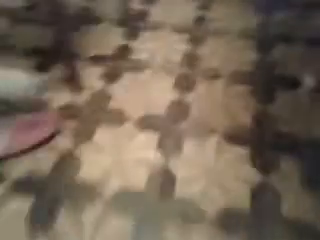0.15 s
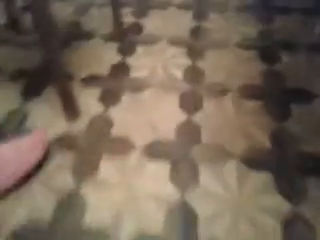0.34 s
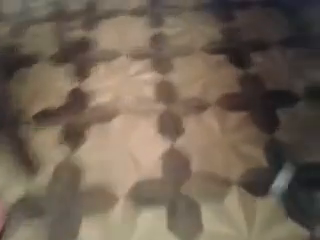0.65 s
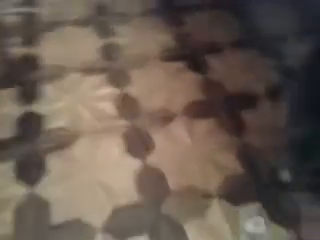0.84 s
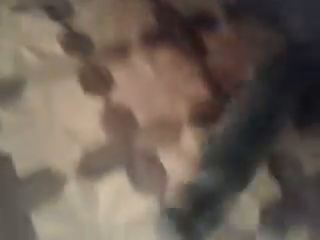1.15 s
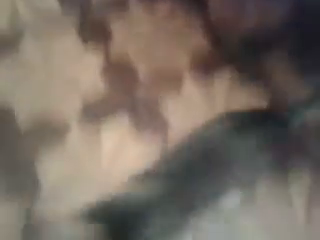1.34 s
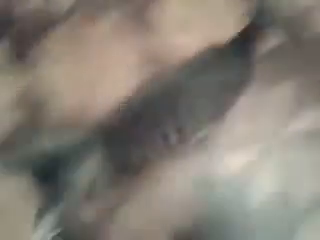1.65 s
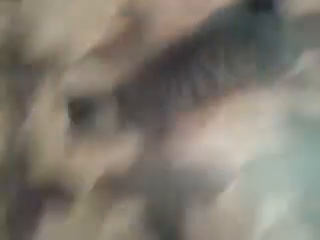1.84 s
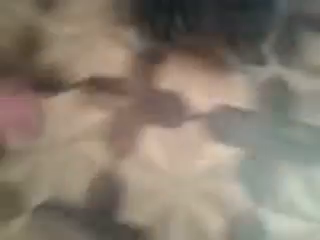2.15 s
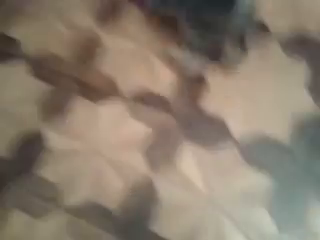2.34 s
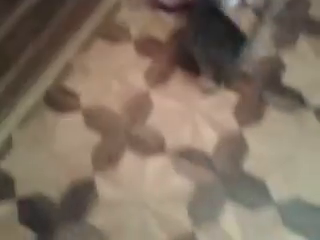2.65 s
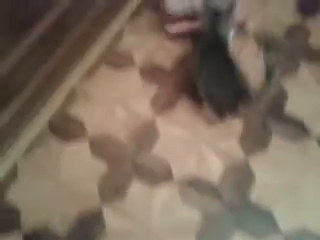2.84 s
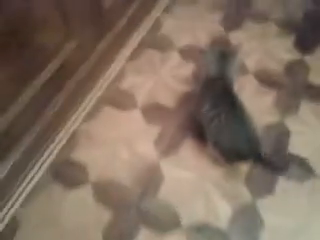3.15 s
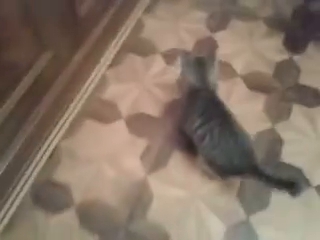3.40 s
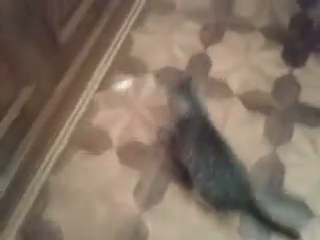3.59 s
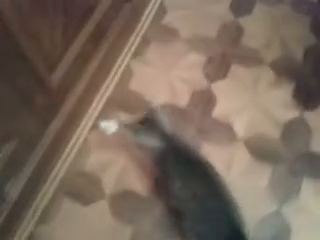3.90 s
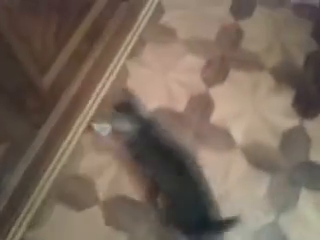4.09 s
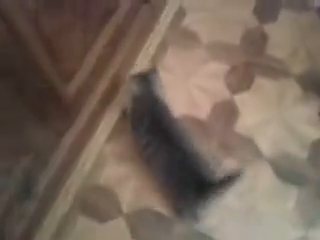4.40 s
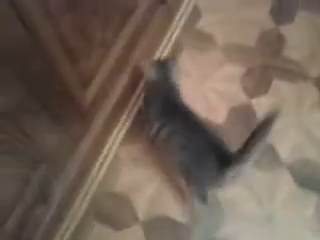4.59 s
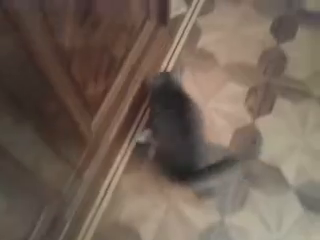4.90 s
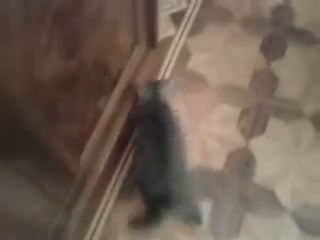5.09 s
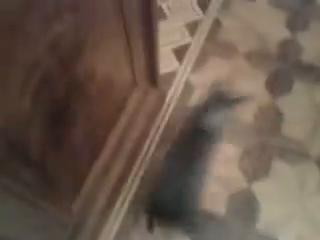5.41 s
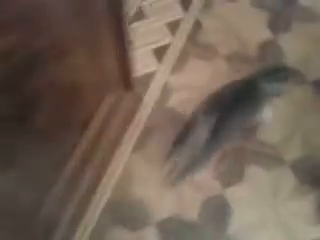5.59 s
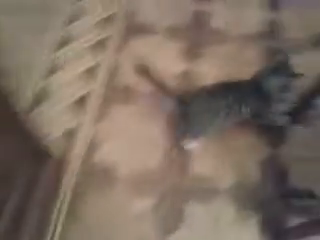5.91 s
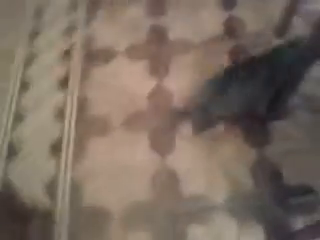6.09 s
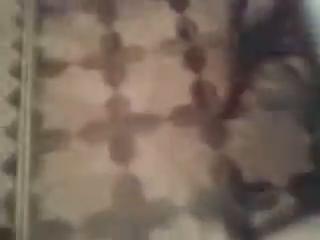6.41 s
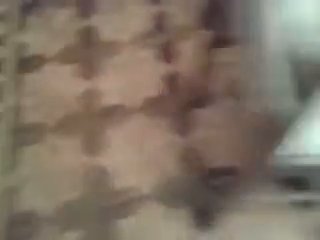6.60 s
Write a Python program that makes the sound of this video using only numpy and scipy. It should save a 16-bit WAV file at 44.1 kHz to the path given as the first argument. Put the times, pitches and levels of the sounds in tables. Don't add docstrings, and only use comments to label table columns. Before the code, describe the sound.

A kitten plays with a small crumpled ball on a tiled floor in a bare, echoing room. Claws tick sharply, paws scrape and the ball rustles, busiest at first. After a clear knock come two loud, bright clatters with ringing echoes mid-way, then quieter rustling slides and a final sharp crack. The handheld recorder is thin in the bass and hissy.

```python
import sys
import numpy as np
from scipy import signal
from scipy.fft import rfft, irfft, next_fast_len
from scipy.io import wavfile

SR = 44100
rng = np.random.default_rng(int(sys.argv[2]) if len(sys.argv) > 2 else 0)


def ratio(d):
    e = np.asarray(d, float) / 20
    return 10 ** e


def waveform_to_disk(signal):
    frames = np.transpose(np.atleast_2d(signal))
    scaled = np.clip(frames, -1, 1) * 32767
    samples = np.round(scaled).astype(np.int16)
    wavfile.write(sys.argv[1], SR, samples)


N = 297461


def rms_one(x):
    return x / np.sqrt(np.mean(x ** 2) + 1e-20)


def at_hz(points, hz):
    table_hz, values = np.array(points).T
    return np.interp(np.log(hz), np.log(table_hz), values)


def butter(x, hz, kind, order=2):
    return signal.sosfilt(signal.butter(order, hz, kind, fs=SR, output="sos"), x)


def colour(x, spectrum):
    size = next_fast_len(N)
    hz = np.maximum(np.arange(size // 2 + 1) * SR / size, 1)
    shaped = rfft(x, size) * ratio(at_hz(spectrum, hz))
    return rms_one(irfft(shaped, size)[:N])


def ring(clicks, hz, t60):
    r = ratio(-60 / (t60 * SR))
    w = 2 * np.pi * hz / SR
    return signal.lfilter([0, np.sin(w)], [1, -2 * r * np.cos(w), r * r], clicks + 1e-18)


def fading(at_s, level_db, t60, build_s):
    energy = np.full(N, 1e-18)
    np.add.at(energy, (np.asarray(at_s) * SR).astype(int), ratio(2 * level_db))
    fall = ratio(-120 / (t60 * SR))
    rise = np.exp(-1 / (build_s * SR))
    return np.sqrt(signal.lfilter([1 - rise], np.convolve([1, -fall], [1, -rise]), energy))


def hiss():
    # frequency in Hz, level in dB per Hz.
    hiss_spectrum = [(65, -72.5), (110, -17.5), (227, 8), (511, 9), (1280, 6), (1670, -10), (4800, 0.5),
                     (6710, -13), (7080, 0), (7460, -35.5), (9700, -52), (16400, -120)]
    level_db = -63
    return ratio(level_db + 1.5) * colour(rng.standard_normal(N), hiss_spectrum)


def rumble():
    # time of a jolt in seconds, level in dB.
    jolts = [(0.18, -72), (0.74, -78), (1.26, -66), (1.38, -80), (1.95, -80), (2.2, -77), (3.04, -65),
             (3.11, -62), (3.31, -62), (3.5, -68), (3.658, -42.5), (4.56, -78), (4.8, -79), (5.22, -78),
             (6.1, -80), (6.38, -77), (6.54, -77)]
    shake = ratio(-80) + fading(*np.transpose(jolts), t60=0.77, build_s=.02)
    low = butter(rng.standard_normal(N), 55, "low", order=6)
    return shake * rms_one(butter(low, 36, "high", order=2))


def pressure():
    # time in seconds, level in dB.
    bustle = [(0.0, -44.5), (0.29, -47), (0.45, -49), (0.66, -47.5), (1.5, -48.5), (1.7, -45.5),
              (2.4, -48.5), (2.65, -50), (2.8, -50.5), (3.1, -51.5), (4.0, -58.5), (4.6, -55.5),
              (4.72, -67.5), (4.94, -54), (5.7, -64), (5.97, -59), (6.2, -54.5), (6.75, -58)]
    # start in seconds, hold in seconds, bright rustle in dB,
    # dull scrape in dB.
    slides = [(0.86, 0.02, -45, -63), (0.928, 0.015, -51, -46), (1.113, 0.036, -53.5, -50),
              (1.198, 0.14, -47, -42.5), (1.405, 0.035, -45.5, -57), (1.872, 0.085, -42.5, -46),
              (1.927, 0.018, -35, -42.5), (1.986, 0.12, -38.5, -57), (2.146, 0.025, -35, -42),
              (2.258, 0.091, -59, -43.5), (3.337, 0.055, -48, -47.5), (3.885, 0.036, -51, -70),
              (4.307, 0.051, -33.5, -53.5), (4.393, 0.11, -48, -49.5), (4.968, 0.027, -45, -56),
              (4.998, 0.12, -37, -61), (5.096, 0.065, -34, -59), (5.19, 0.046, -43.5, -60),
              (5.268, 0.021, -33, -55), (5.323, 0.064, -48, -67), (5.38, 0.019, -42.5, -64),
              (5.454, 0.026, -52.5, -52.5), (6.504, 0.01, -39.5, -57), (6.573, 0.11, -43, -55.5)]
    attack_s, release_db_per_s = 0.01, 147.5
    scrape_db, scrape_follows = -56, 1
    bustle_db = np.interp(np.arange(N) / SR, *np.transpose(bustle))
    dull_db = scrape_db + scrape_follows * (bustle_db - bustle_db.mean())
    power = ratio(2 * np.array([bustle_db, dull_db]))
    for s, hold_s, *levels_db in slides:
        start = int(s * SR)
        t = np.arange(min(SR, N - start)) / SR
        release = ratio(-release_db_per_s * np.maximum(t - attack_s - hold_s, 0))
        shape = np.minimum(t / attack_s, 1) * release
        power[:, start:start + SR] += (ratio(np.reshape(levels_db, (-1, 1))) * shape) ** 2
    return np.sqrt(power)


def friction(spectrum, per_s, size_db, wet_db, patchy_db):
    sizes = ratio(size_db * np.minimum(rng.exponential(1, N), 5))
    slips = (rng.random(N) < per_s / SR) * sizes * rng.choice([-1, 1], N)
    clumps = ratio(3.2 * rms_one(butter(rng.standard_normal(N), 25, "low")))
    blur = ratio(wet_db) * rng.standard_normal(N)
    even = colour(rms_one(slips * clumps) + blur, spectrum)
    edges = np.linspace(np.sqrt(100), np.sqrt(8500), 9) ** 2
    wander = ratio(patchy_db * rng.standard_normal((len(edges), 60)))
    wander[::2] *= -1
    place = np.linspace(0, 59, N)
    out = np.zeros(N)
    for low, high, gains in zip(edges, edges[1:], wander):
        out += butter(even, [low, high], "band") * np.interp(place, np.arange(60), gains)
    return rms_one(out)


def shell(x):
    # frequency in Hz, width in Hz, level in dB.
    ball_shell = [(4440, 420, -21.5), (5575, 660, -14.5), (7180, 350, -19)]
    lifted = sum(ratio(db) * rms_one(ring(x, hz, 1.3 / width_hz)) for hz, width_hz, db in ball_shell)
    return rms_one(x + lifted)


def scuff():
    # frequency in Hz, level in dB per Hz.
    rustle_spectrum = [(880, -42.5), (1500, -11), (2670, -19.5), (3310, -11.5), (3860, -11.5), (4250, -9.5),
                       (6700, -2), (7460, 7.5), (9700, -44.5), (16400, -120)]
    scrape_spectrum = [(88, -68.5), (150, -26), (183, -19), (498, -6), (1270, -2), (1860, -2), (3500, -7.5),
                       (4550, -24.5), (7700, -120)]
    rustle, scrape = pressure()
    bright = shell(friction(rustle_spectrum, 5000, size_db=3, wet_db=2, patchy_db=2.2))
    dull = friction(scrape_spectrum, 1500, size_db=2.5, wet_db=4, patchy_db=1.4)
    return rustle * bright + scrape * dull


def contacts():
    # time in seconds, peak in dB, fullness in dB, room share in dB.
    claws = [(0.0963, -28, -24, 4), (0.1389, -32, -7, 7), (0.6215, -22.5, -11, 0), (0.7579, -16, -2, 1),
             (0.8737, -23.5, -7, 3), (0.9198, -22.5, -16, -19), (1.0885, -17.5, -18, -1),
             (1.0925, -12.5, -6, -4.5), (1.2272, -10.5, -19, -2), (1.3723, -22, -2, 2),
             (1.5591, -11.5, -23, -1.5), (1.6801, -22, -39, -1.5), (1.94, -10.5, -23, -2),
             (2.0337, -23.5, -3, 4.5), (3.3459, -19, -22.5, 4), (4.205, -33, -1, 5), (4.2882, -17, -16, 1),
             (4.7012, -29, 1, 0.5), (5.1144, -19.5, -22, 7.5), (5.294, -23.5, -28, 0),
             (5.3237, -19, -23, -6), (5.4785, -23, -3, -4), (5.6254, -36, 6, 4), (5.658, -20.5, -3.5, 0),
             (5.9985, -25, 3.5, -14), (5.9935, -35, -2, -3), (1.156, -27, 4, 8), (1.1805, -28, 7.5, 9.5),
             (1.5254, -27.5, 3, -5)]
    ball = [(0.1604, -25.5, -0.5, 4.5), (0.2663, -32.5, 8.5, 3), (0.7956, -21, -6, -23),
            (1.059, -23.5, -3, 3), (1.578, -26, 0, 5.5), (1.7265, -22.5, -7, -13), (1.9164, -25, -4, -3),
            (2.1114, -24, -4, 9), (2.2872, -14, -29, -4.5), (2.3144, -17, -6.5, 0.5), (2.4304, -34.5, 5, 3),
            (2.5656, -27.5, -1, -3), (2.7326, -13.5, -4.5, -0.5), (2.988, -34, 4, 2.5),
            (3.3678, -20, -8, -19), (4.6507, -27.5, -8, 0.5), (5.2724, -26, 3, 3.5), (5.4475, -34, 6, -3),
            (5.5611, -19, -8.5, 2.5), (5.7751, -32, -14, 5.5), (6.0084, -15, -7, -25),
            (6.2684, -34.5, -10, 8.5), (6.3602, -25, -3, 4), (6.5073, -29.5, 3.5, 2),
            (6.5689, -29, -3, 12.5)]
    paws = [(0.6654, -30, 0.5, 5), (0.7842, -29, -20, 1), (0.9382, -30.5, 4.5, -18),
            (0.9461, -30.5, -10, -11), (1.6484, -38, -26, 2), (1.6994, -38, 9, -4), (1.7141, -43, 16.5, 4),
            (1.8312, -41, -14, 4), (2.156, -24, -28, -2), (2.911, -38.5, 0, 8), (3.0322, -26.5, 5.5, -7.5),
            (3.2847, -42.5, -2, 15), (4.119, -43, 10.5, 6.5), (4.6401, -40.5, 17, 1.5),
            (5.5976, -40.5, 13, 5), (6.2994, -51.5, 21, 1), (6.3184, -44, 13, 6.5)]
    kinds = [(claws, -30.5), (ball, -17.5), (paws, 0)]
    return np.array([(s, db, full_db, body_db, wet_db)
                     for rows, body_db in kinds for s, db, full_db, wet_db in rows])


def rattle(rows, contact_ms, count):
    s, *levels_db = np.repeat(rows, count, axis=0).T
    late = rng.random((len(rows), count)) * (np.arange(count) > 0) * np.reshape(contact_ms, (-1, 1))
    return s + late.ravel() / 1000, levels_db


def tint(hz, top_db, *rel_db):
    colour_hz = [350, 900, 2200, 4800]
    # frequency in Hz, level in dB.
    mic_colour = [(150, -35.5), (400, -5), (1000, 10), (3000, -1), (5000, -3.5), (6800, 1.5), (7400, 6.5)]
    points_hz = colour_hz[-len(rel_db) - 1:]
    shares = [np.interp(np.log(hz), np.log(points_hz), row) for row in np.eye(len(points_hz))]
    return top_db + sum(share * db for share, db in zip(shares, rel_db[::-1])) + at_hz(mic_colour, hz)


def strike(at_s, levels_db, cycles, uneven_db, count=30):
    at = (np.asarray(at_s) * SR).astype(int)
    out = np.zeros(N)
    luck = rng.standard_normal((len(at), 2 * count))
    for k, hz in enumerate(np.linspace(np.sqrt(330), np.sqrt(7250), count) ** 2):
        strength = ratio(tint(hz, *levels_db) + uneven_db * luck[:, k])
        clicks = np.zeros(N)
        np.add.at(clicks, at, strength * np.sign(luck[:, count + k]))
        out += ring(clicks, hz, cycles / hz + 0.0067)
    return butter(out, 570, "high", order=3)


def room(at_s, build_s, *levels_db):
    # frequency in Hz, time to fall 60 dB in seconds.
    room_t60 = [(200, 0.64), (700, 0.64), (2000, 0.59), (4000, 0.69), (7000, 0.47)]
    # frequency in Hz, level in dB.
    room_warmth = [(200, 14), (500, 8), (1200, -1)]
    edges = 170 * 2 ** np.arange(0, 5.7, 1 / 3)
    white = rng.standard_normal((2, N))
    out = np.zeros(N)
    for k, (low, high) in enumerate(zip(edges, edges[1:])):
        hz = np.sqrt(low * high)
        level_db = tint(hz, *levels_db) + at_hz(room_warmth, hz)
        echo = fading(at_s, level_db, at_hz(room_t60, hz), build_s)
        out += butter(white[k % 2], [low, high], "band") * echo
    return out


def ticks():
    rows = contacts()
    s, top_db, middle_db, body_db, wet_db = rows.T
    at_s, levels_db = rattle(rows[:, :4], contact_ms=3.0, count=3)
    direct = strike(at_s, levels_db, cycles=1.7, uneven_db=1.5) * ratio(-17.5)
    t = np.arange(SR // 20) / SR
    scatter = rng.standard_normal(len(t)) * ratio(-22 - 60 * t / .025) * (t > .0006)
    echoes = room(s + 0.0022, 0.00073, top_db + wet_db - 13.5, middle_db, body_db)
    return direct + signal.fftconvolve(direct, scatter)[:N] + echoes


def pings():
    # start in seconds, frequency in Hz, level in dB, ring time in seconds.
    ping_rows = [(0.2658, 2300, -36, 0.014), (0.7579, 7040, -19, .01), (1.5591, 4650, -29, 0.013),
                 (1.6477, 313, -38, .06), (1.6813, 5550, -26, 0.018), (2.158, 790, -43, .03),
                 (2.157, 1830, -23.5, 0.021), (2.733, 6060, -27, .015), (3.0338, 1050, -20, 0.014),
                 (3.032, 2600, -32, 0.0085), (2.66, 368, -45, 0.17), (0.6654, 1320, -29, .015),
                 (0.9461, 1520, -30, .015), (4.305, 4080, -30, 0.04), (4.7002, 4500, -35, 0.019),
                 (5.4785, 3450, -30, 0.022), (5.5619, 6970, -12.5, .01), (5.657, 3950, -23, 0.011),
                 (6.0075, 7030, -0.5, 0.0073)]
    out = np.zeros(N)
    t = np.arange(SR // 10) / SR
    for s, hz, db, t60 in ping_rows:
        start = int(s * SR)
        swell = 1 - np.exp(-t * hz / 1.0)
        out[start:start + len(t)] += ratio(db - 60 * t / t60) * swell * np.sin(2 * np.pi * hz * t)
    return out


def ripple(x):
    depth_db, width_hz = 2.1, 80
    size = next_fast_len(N)
    hz = np.arange(size // 2 + 1) * SR / size
    bumps_db = depth_db * np.interp(hz / width_hz, np.arange(600), rng.standard_normal(600))
    return irfft(rfft(x, size) * ratio(bumps_db), size)[:N]


def knocks():
    # time in seconds, top in dB, middle and body in dB #
    # relative to the top, contact time in ms.
    knock_rows = [
        (0.3094, -33, 3, -22, 12),
        (1.6482, -52, -6, 7, 6.9),
        (2.6027, -18.5, -5.5, -13, 4.6),
        (3.0314, -45, 11, 13.5, 11),
        (3.4101, -7, -3.5, -13.5, 4.4),
        (3.6599, -5, -7.5, -8, 16),
        (3.6667, -16.5, 15.5, 4, 10),
        (4.8494, -56, -52, 7.5, 5.3),
        (6.0107, -15.5, -25, -18, 2.2),
        (6.0164, -22.5, 5, -24, 2.2),
    ]
    # start in seconds, frequency in Hz, width in Hz, level in dB, time to fall 60 dB in seconds.
    clinks = [(.305, 3410, 150, -41, 0.6), (0.31, 1704, 150, -42.5, 0.39), (4.976, 5650, 400, -41, .5),
              (5.6, 4330, 250, -46, 0.96), (4.85, 740, 320, -50.5, 1), (2.61, 2510, 27, -30, 0.5),
              (2.61, 2600, 38, -31.5, 0.53), (2.6, 1540, 85, -36, 0.69), (2.61, 2330, 240, -36, 0.68),
              (2.61, 3380, 60, -50, 0.32), (2.61, 3300, 60, -41, 0.28), (2.61, 6850, 60, -36, 0.34),
              (2.61, 1950, 150, -39, 0.92), (3.67, 1730, 80, -30, 0.31), (3.67, 2940, 78, -24.5, .5),
              (3.411, 2310, 79.5, -34, 0.76), (3.41, 1500, 420, -24, 0.62), (3.429, 250, 40, -45, 0.67),
              (3.669, 1300, 204, -19.5, 0.16)]
    *columns, body_db, contact_ms = np.transpose(knock_rows)
    thud_db = -5 + 1.65 * body_db
    rows = np.transpose([*columns, body_db, thud_db])
    at_s, (top_db, *rel_db) = rattle(rows, contact_ms, count=6)
    out = ripple(room(at_s - .001, 0.00039, top_db - 11, *rel_db))
    white = butter(rng.standard_normal(N), 210, "high", order=4)
    for s, hz, width_hz, level_db, t60 in clinks:
        twice = ring(ring(white, hz, 2.0 / width_hz), hz, 2.0 / width_hz)
        out += rms_one(twice) * fading([s], level_db, t60, 0.0051)
    return out


def scene():
    heard = scuff() + hiss() + ticks() + pings() + knocks()
    return (butter(heard, 84, "high", order=4) + rumble())[None]


def top_cut(x):
    return signal.sosfilt(signal.butter(12, 9540, fs=SR, output="sos"), x)


def record(dry):
    sample_hz = 16000
    band = signal.sosfilt(signal.cheby2(12, 60, 7980, fs=SR, output="sos"), dry)
    soft = butter(dry, 8360, "low", order=8)
    image = soft * np.cos(2 * np.pi * sample_hz * np.arange(N) / SR)
    image = ratio(-35.5) * butter(image, [8150, 9050], "band", order=5)
    mix = band + image + .0007
    return top_cut(mix)


dry = scene()
out = record(dry)
waveform_to_disk(out)
```